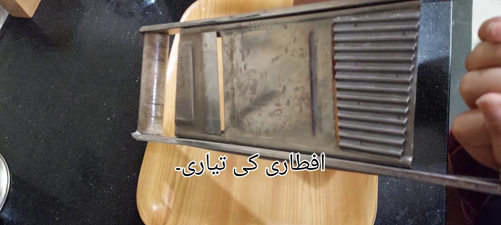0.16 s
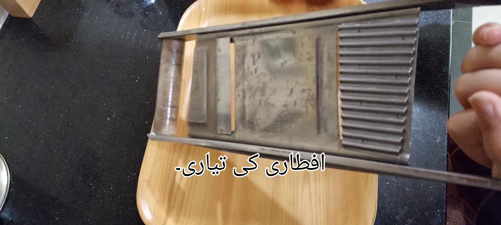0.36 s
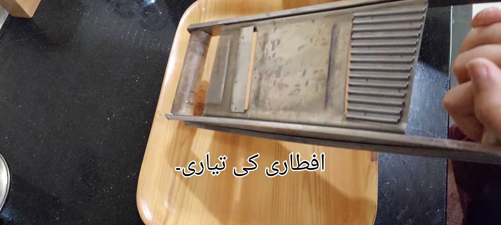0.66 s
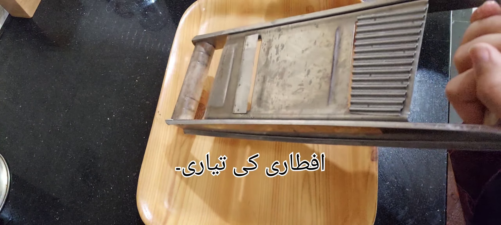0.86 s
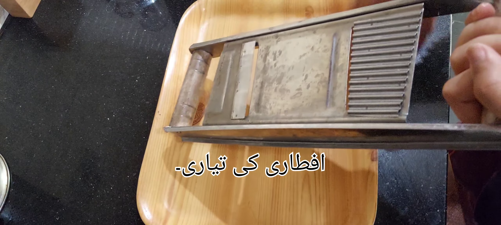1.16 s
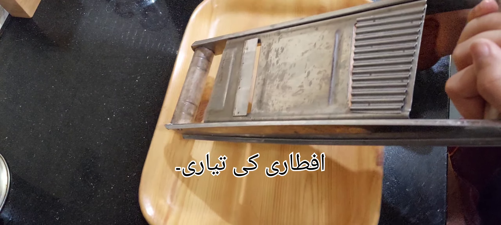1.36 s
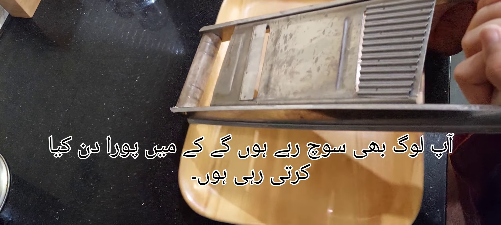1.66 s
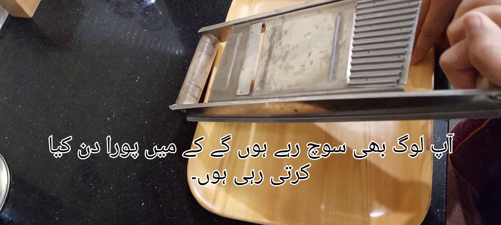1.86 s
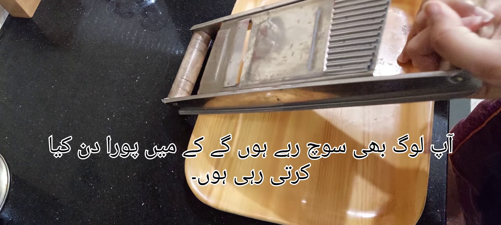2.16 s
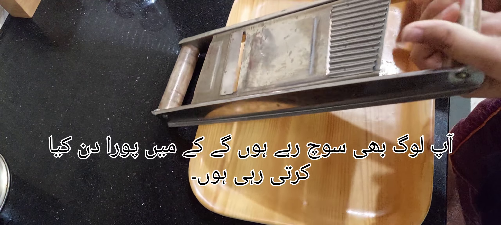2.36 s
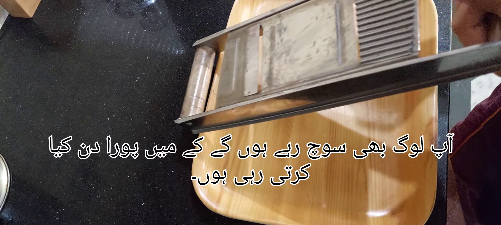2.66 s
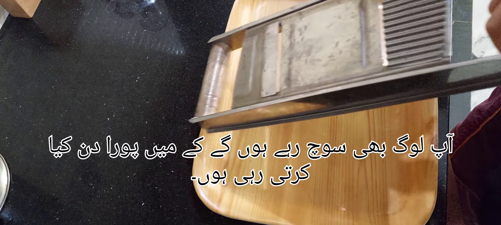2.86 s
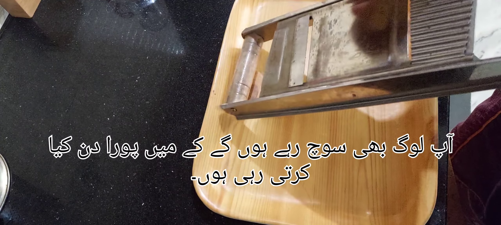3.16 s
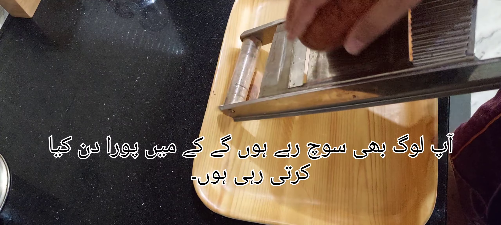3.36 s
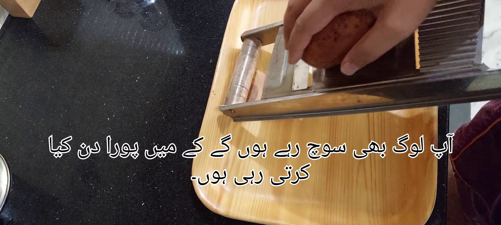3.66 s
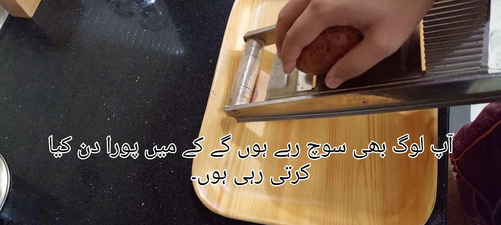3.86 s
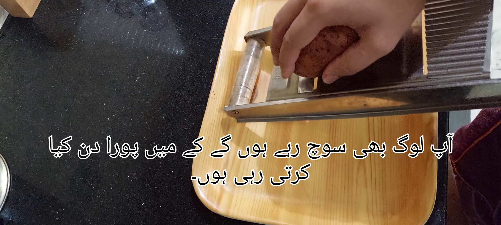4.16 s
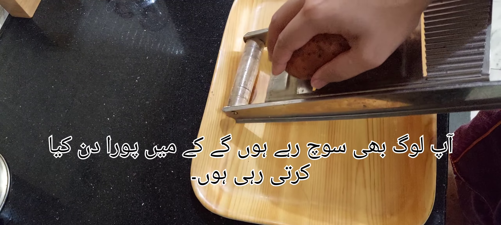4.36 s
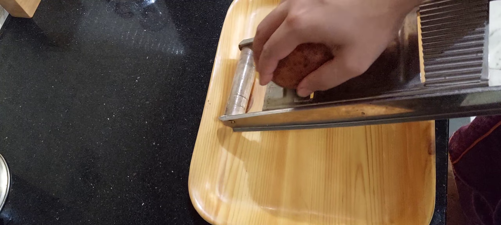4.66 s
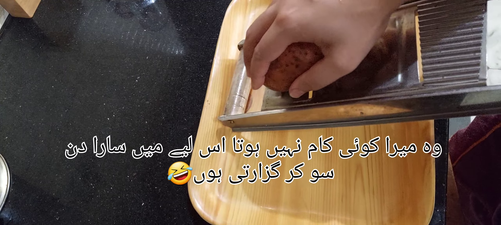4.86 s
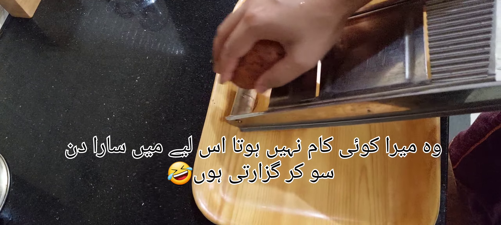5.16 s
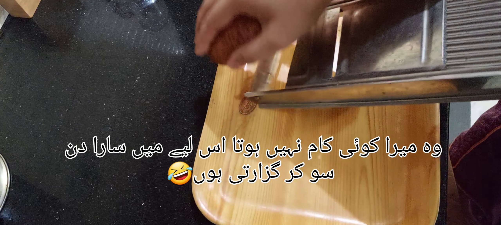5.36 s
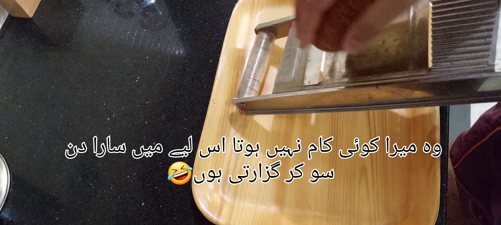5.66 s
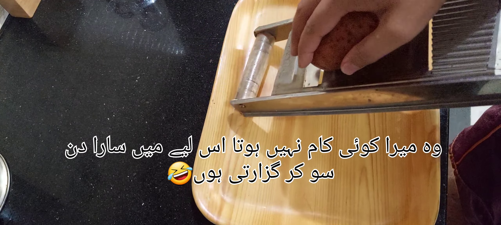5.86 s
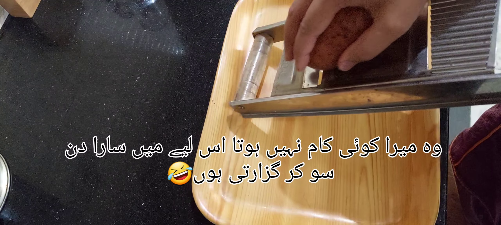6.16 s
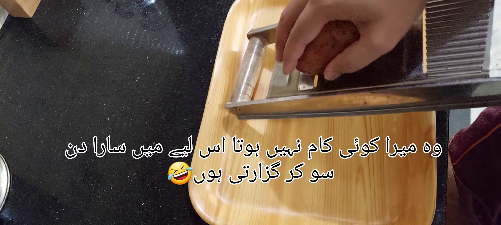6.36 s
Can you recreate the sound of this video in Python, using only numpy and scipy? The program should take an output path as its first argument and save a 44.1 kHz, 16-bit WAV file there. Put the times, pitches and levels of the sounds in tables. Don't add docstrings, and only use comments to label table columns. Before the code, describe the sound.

A metal slicer scrapes and clatters on a wooden tray, is set down hard, then a wet potato hisses over its blade amid low hum

```python
import sys
import numpy as np
from scipy import signal
from scipy.fft import rfft, irfft, next_fast_len
from scipy.io import wavfile

SR = 44100
rng = np.random.default_rng(int(sys.argv[2]) if len(sys.argv) > 2 else 0)


def transcribe(u):
    v = np.clip(np.atleast_2d(u).T, -1, 1)
    q = np.round(v * 32767).astype(np.int16)
    wavfile.write(sys.argv[1], SR, q)


def decibels_to_gain(level_db):
    exponent = np.asarray(level_db, float) / 20
    return 10 ** exponent


N = 286650


def rms_one(x):
    return x / np.sqrt(np.mean(x ** 2) + 1e-20)


def lowpass(x, order, hz):
    return signal.sosfilt(signal.butter(order, hz, fs=SR, output="sos"), x)


def in_time(rows):
    s, *columns = np.transpose(rows)
    return [np.interp(np.arange(N) / SR, s, c) for c in columns]


def at_hz(points, hz):
    point_hz, value = np.array(points).T
    return np.interp(np.log(hz + 1), np.log(point_hz), value)


def drift(rate_hz):
    r = np.exp(-80 * np.pi * rate_hz / SR)
    white = rng.standard_normal(N // 40 + 2002)
    slow = rms_one(signal.lfilter([1], [1, -2 * r, r * r], white)[2000:])
    return np.interp(np.arange(N) / 40, np.arange(len(slow)), slow)


def pair(alike):
    mid, side = rfft(rng.standard_normal((2, N)))
    c = np.clip(at_hz(alike, np.fft.rfftfreq(N, 1 / SR)), -1, 1)
    return irfft(np.sqrt(1 + c) * mid + np.sqrt(1 - c) * side * [[1], [-1]], N)


def colour(noise, spectrum):
    gain = decibels_to_gain(at_hz(spectrum, np.fft.rfftfreq(N, 1 / SR)))
    return rms_one(irfft(rfft(noise) * gain, N))


def ring(force, hz, t60):
    r = decibels_to_gain(-60 / (np.clip(t60, .01, .5) * SR))
    w = 2 * np.pi * hz / SR
    return signal.lfilter([0, np.sin(w)], [1, -2 * r * np.cos(w), r * r], force + 1e-18)


def swells(rows, rest_db):
    t = np.arange(N) / SR
    power = decibels_to_gain(rest_db) ** 2
    for middle, half, db in rows:
        fall_db = 12 * ((t - middle) / half) ** 2
        power = power + decibels_to_gain(db - np.minimum(fall_db, 99)) ** 2
    return 10 * np.log10(power)


def drone(hz, db):
    turn = 2 * np.pi * np.cumsum(hz * (1 + 0.01937 * drift(4.12))) / SR
    return decibels_to_gain(db + 2.2 * drift(10.5)) * np.sin(turn)


# time in seconds, upper pitch in Hz, lower pitch in Hz.
ENGINE_PITCH = [(0, 155.8, 111), (1.5, 152.4, 110.6), (3, 152.1, 102), (6.5, 151.7, 100.8)]
# middle in seconds, half length in seconds, level in dB.
UPPER_ENGINE = [
    (.08, 0.3, -39),
    (.56, 0.21, -43.5),
    (1.05, 0.11, -48),
    (1.6, 0.37, -50),
    (2.0, 0.33, -44),
    (2.45, 0.19, -44.5),
    (3.15, 0.62, -46.5),
    (3.9, 0.4, -51),
    (5.85, 0.67, -52.5),
]
# middle in seconds, half length in seconds, level in dB.
LOWER_ENGINE = [
    (.15, 0.12, -39),
    (.58, 0.2, -40.5),
    (.98, 0.73, -47.5),
    (1.44, 0.054, -33.5),
    (2.8, 0.088, -44),
    (3.33, 0.33, -46),
    (4.2, 0.41, -52.5),
    (5.7, 2.5, -51.5),
]


def engines():
    upper_hz, lower_hz = in_time(ENGINE_PITCH)
    upper_db, lower_db = swells(UPPER_ENGINE, rest_db=-85), swells(LOWER_ENGINE, rest_db=-85)
    return drone(upper_hz, upper_db) + drone(lower_hz, lower_db - 2.5)


def hum(white, hz, width_hz):
    r = np.exp(-np.pi * width_hz / SR)
    sos = [[1, 0.0031, -1.2, 1, -2 * r * np.cos(2 * np.pi * hz / SR), r * r]] * 2
    return rms_one(signal.sosfilt(sos, white))


# frequency in Hz, likeness from 0 to 1.
AIR_LIKENESS = [(60, 0.89), (180, 0.94), (400, 0.5), (1650, 0.025), (5000, 0.91), (15000, 1)]
# frequency in Hz, level in dB per Hz.
AIR_SPECTRUM = [(13, -75.5), (22, -23), (97, -7), (152, -7.5), (223, -14.5), (432, -15.5), (569, -21.5),
                (672, -21), (961, -25.5), (1270, -29.5), (2590, -69), (3510, -83.5), (7810, -42),
                (9480, -91), (16000, -72)]
# time in seconds, rumble level in dB.
TRAFFIC_LEVEL = [(0, -46.5), (.18, -41.5), (.4, -50.5), (1.05, -47.5), (1.3, -47), (1.43, -42.5),
                 (1.7, -46), (3.3, -50), (3.7, -52.5), (4.2, -52.5), (4.76, -49), (6.5, -49.5)]
# frequency in Hz, width in Hz, rms level in dB.
MACHINE_HUMS = [(62.5, 5, -61.5), (200.4, 9.8, -62.5), (299.7, 6.8, -65), (696, 12, -74.5),
                (966, 2.9, -69.5), (2590, 300, -76.5), (4820, 940, -80.5), (7830, 610, -85.5),
                (13300, 4300, -86.5)]


def background():
    rumble_db, = in_time(TRAFFIC_LEVEL)
    air = colour(pair(AIR_LIKENESS), AIR_SPECTRUM)
    low = lowpass(air, 2, 900)
    air = low * decibels_to_gain(rumble_db) + (air - low) * decibels_to_gain(-49.5)
    white = pair(AIR_LIKENESS)
    hums = sum(decibels_to_gain(db) * hum(white, hz, width_hz) for hz, width_hz, db in MACHINE_HUMS)
    return air + hums + engines()


def slides(starts, lengths, levels_db):
    grip, sag, release = 3498, 11, 256.5
    t = np.arange(N) / SR
    out = np.full(N, -200.)
    for start, length, db in zip(starts, lengths, levels_db):
        bite = grip * np.maximum(start - t, 0)
        slacken = sag * np.maximum(t - start, 0)
        let_go = release * np.maximum(t - start - length, 0)
        out = np.maximum(out, db - bite - slacken - let_go)
    return out


def patchy(noise, patchy_db):
    out = 0
    for cut_hz in (2000, 4000, 8000, .45 * SR):
        band = lowpass(noise, 2, cut_hz)
        out = out + band * decibels_to_gain(patchy_db * (drift(70) + drift(28)))
        noise = noise - band
    return out


def held(modes):
    return [(hz, db, min(t60, .06)) for hz, db, t60 in modes]


# frequency in Hz, level in dB, decay T60 in seconds.
STEEL_MODES = [(840, -4.5, 0.085), (1160, 0.5, 0.083), (1384, 1, 0.029), (1594, -2, 0.07), (1716, 1, 0.059),
               (1960, -7.5, 0.094), (2123, -11.5, 0.1), (2245, -2, 0.062), (2600, -4, 0.04),
               (2855, -6, 0.05), (3114, -8, 0.045), (3700, -13.5, 0.03), (4000, -23, 0.04),
               (4850, 5, 0.009)]
# frequency in Hz, level in dB, decay T60 in seconds.
WOOD_MODES = [(520, -15, 0.06), (594, -15, 0.06), (966, -3.5, 0.027), (1060, -8.5, 0.056),
              (1250.5, 0, 0.052), (1480, -1, 0.015), (1630, -3, 0.045), (1840, -4.5, 0.073),
              (2033, 0, 0.027), (2200, -2.5, 0.035), (2352, -11.5, 0.077), (2707, -15.5, 0.043),
              (3200, -15.5, 0.04), (4330, -13, 0.03)]


def body(force_of, modes, turn):
    out = np.zeros((2, N))
    for k, (hz, db, t60) in enumerate(modes):
        mode = decibels_to_gain(db) * ring(force_of(hz), hz, t60)
        lag = round(turn * SR / hz)
        out[k % 2] += mode
        out[1 - k % 2, lag:] += mode[:N - lag]
    return out


# frequency in Hz, level in dB per Hz.
FINGER_HISS = [(1470, -4), (2500, -2.5), (2620, -6.5), (4500, -2.5), (6300, -9.5), (7620, -1), (8620, -7.5),
               (10900, -10.5), (12200, -8.5), (15700, -15.5)]
# frequency in Hz, level in dB per Hz.
POTATO_HISS = [(500, -24), (800, -35), (1500, 5.5), (2300, 0.5), (3100, -4.5), (4200, 5), (6800, -7),
               (7600, 2.5), (10000, -4), (12300, 2.5), (14300, -4), (15800, -1)]


def skin_hiss(level_db):
    white = pair([(1500, 0.18), (6000, 0.14), (8000, 0.97), (14000, 0.79)])
    fingers = patchy(colour(white, FINGER_HISS), patchy_db=0.9)
    potato = patchy(colour(white, POTATO_HISS), patchy_db=0.5)
    hiss = np.where(np.arange(N) < 3.15 * SR, fingers, potato)
    hiss = hiss * decibels_to_gain(level_db + 3.0 + 1.45 * drift(30)) * decibels_to_gain([[.6], [-.6]])
    dull = lowpass(hiss[0], 4, 6000)
    hiss[0] += np.roll(dull, 11) - dull
    return hiss


# frequency in Hz, level in dB per Hz.
SCUFF = [(59, -45), (100, 2.5), (216, 1.5), (401, -7), (536, 0.5), (625, -5), (1330, -4.5), (2220, -4),
         (2780, -10.5), (6000, -19.5), (7800, -51), (13200, -120)]


def frame_drag(level_db):
    def slips(hz):
        chance = rng.random(N) < 900 / SR
        return chance * rng.standard_normal(N) * decibels_to_gain(2.5 * drift(9))
    rattle = rms_one(body(slips, held(STEEL_MODES[:11] + WOOD_MODES[:12]), turn=0.33))
    scuff = colour(pair([(500, 0.94), (5000, 0.046)]), SCUFF)
    return decibels_to_gain(level_db + 0.35 * drift(36)) * (decibels_to_gain(-3.5) * rattle + decibels_to_gain(-2.0) * scuff)


# start in seconds, length in seconds, hiss level in dB, drag level in dB.
FRAME_SLIDES = [(0, 0.19, -79, -55.5), (.155, 0.067, -78, -51.5), (0.256, 0.11, -85, -58),
                (1.342, 0.045, -54.5, -41), (1.393, 0.032, -50.5, -31), (1.458, 0.12, -49, -45.5),
                (1.584, .26, -52.5, -46), (2.038, 0.055, -60, -44.5), (2.095, 0.32, -61.5, -47.5),
                (2.427, 0.018, -58.5, -36), (2.463, 0.034, -76, -41), (2.542, 0.0053, -37.5, -26.5),
                (2.595, 0.17, -60, -47), (2.788, .16, -65, -52), (3.192, .012, -62, -30),
                (3.203, 0.16, -75, -44), (3.4, 0.13, -81, -56), (5.28, 0.0041, -44.5, -55),
                (5.303, 0.083, -53.5, -37), (5.44, 0.11, -71, -53.5), (5.848, 0.0085, -60, -46),
                (5.895, 0.077, -63.5, -43)]
# middle in seconds, half length in seconds, hiss level in dB, drag level in dB.
RUB_STROKES = [(2.014, 0.07, -66, -50.5), (2.99, 0.066, -73.5, -61), (3.826, 0.064, -73, -55.5),
               (3.84, 0.01, -58.5, -62), (5.23, 0.16, -60.5, -59), (4.034, 0.082, -69.5, -58),
               (4.18, 0.052, -55, -54), (4.39, 0.069, -60, -75), (4.537, 0.061, -54, -53.5),
               (4.703, 0.062, -57, -72), (4.79, 0.069, -49, -51.5), (5.049, 0.062, -46.5, -51),
               (5.116, 0.075, -43.5, -50.5), (5.266, 0.012, -56, -60), (4.29, .08, -76, -72),
               (4.927, .06, -70.5, -77), (6.18, 0.052, -71, -71), (5.752, .1, -69.5, -55),
               (6.075, 0.028, -58.5, -53.5), (6.11, 0.041, -59, -58), (6.278, 0.046, -50.5, -53.5),
               (6.366, 0.1, -66, -62), (6.5, 0.046, -58.5, -60)]


def rubbing():
    start, length, slide_hiss, slide_drag = np.transpose(FRAME_SLIDES)
    middle, half, stroke_hiss, stroke_drag = np.transpose(RUB_STROKES)
    hiss_db = np.maximum(slides(start, length, slide_hiss),
                         swells(zip(middle, half, stroke_hiss), rest_db=-86.5))
    drag_db = np.maximum(slides(start, length, slide_drag),
                         swells(zip(middle, half, stroke_drag), rest_db=-63))
    return skin_hiss(hiss_db) + frame_drag(drag_db)


def train(at, gain, t60=None):
    clicks = np.zeros(N)
    clicks[at] = gain
    if t60 is None:
        return clicks
    return signal.lfilter([1], [1, -decibels_to_gain(-60 / (t60 * SR))], clicks)


def rings(at, db, crack_db, ring_hz):
    steel_gap, wood_gap = (np.abs(ring_hz - np.array(modes)[:, :1]).min(axis=0)
                           for modes in (STEEL_MODES, WOOD_MODES))
    tray_share = np.where(wood_gap < steel_gap, 0.63, 0.39)

    def blows(share, hz):
        near_spot = np.exp(-(np.log(hz / ring_hz) / 0.035) ** 2)
        force = share * decibels_to_gain(db - 9.5 + 10.8 * near_spot)
        force = force * decibels_to_gain((crack_db + 10.5) * np.clip(hz / 2200 - 1, 0, 1))
        hit = train(at, force * decibels_to_gain(rng.normal(0, 4.0, len(at))))
        chatter = train(at, force, t60=0.052) * rng.standard_normal(N)
        return 1.12 * rng.choice([-1, 1]) * hit + 0.082 * chatter
    steel = body(lambda hz: blows(1 - tray_share, hz), held(STEEL_MODES), turn=0.22)
    wood = body(lambda hz: blows(tray_share, hz), held(WOOD_MODES), turn=0.18)
    return lowpass(steel + wood, 4, 6030)


# frequency in Hz, level in dB per Hz.
CRACK_SPECTRUM = [(290, 6.5), (500, -2.5), (919, -18), (1140, -15), (1440, -11.5), (2290, -6.5),
                  (3980, -13), (12100, -37), (16000, -63.5)]


def crack(at, db):
    noise = colour(pair([(500, 0.15), (5000, 0.19), (8000, 0.36)]), CRACK_SPECTRUM)
    burst = train(at, decibels_to_gain(db + 12.0), t60=0.041) + train(at, decibels_to_gain(db - 6.0), t60=0.45)
    return noise * lowpass(burst, 2, 1500)


# frequency in Hz, level in dB, decay T60 in seconds.
WORKTOP_MODES = [(119.6, -7.5, 0.73), (203.4, -5, 0.26), (272.5, -5, 0.045), (399, -4.5, 0.15),
                 (420, -31, 0.12)]


def worktop_thud(at, db):
    band = signal.butter(2, [70, 420], "band", fs=SR, output="sos")
    push = signal.sosfilt(band, train(at, decibels_to_gain(db - 1.5)))
    return sum(decibels_to_gain(level_db) * ring(push, hz, t60) for hz, level_db, t60 in WORKTOP_MODES)


# time in seconds, peak in dB, treble crack in dB re peak, strongest ring in Hz, worktop thud in dB re
SLICER_KNOCKS = [(0.082, -36, -32, 1100, -16), (0.088, -38, -30, 1160, -20),
                 (0.144, -33.5, -31, 1160, -23), (0.172, -31.5, -36, 1060, -19),
                 (1.341, -31, -24, 1160, -25), (1.356, -21, -16.5, 1060, -21),
                 (1.385, -22, -17, 1160, -13), (1.405, -16, -11, 1117, -11), (1.424, -17, -27, 1320, -22),
                 (1.434, -26, -36, 1160, -18), (1.445, -31, -18, 1680, -19), (1.508, -34, -12, 1630, -23),
                 (1.592, -29, -27, 1194, -5.5), (1.598, -34.5, -29, 1960, -16),
                 (1.612, -37, -30, 1210, -12), (1.744, -39, -6.5, 1160, -17),
                 (2.049, -30, -18, 1546, -13), (2.057, -37, -20, 2033, -13),
                 (2.066, -34.5, -25, 1480, -15), (2.182, -37.5, -22, 1480, -15),
                 (2.217, -40.5, -10.5, 1240, -20), (2.318, -44, -11, 1650, -20),
                 (2.344, -30, -21, 1384, -29), (2.353, -29.5, -26, 1675, -24),
                 (2.362, -35, -25, 1630, -24), (2.382, -25, -14.5, 1060, -23),
                 (2.43, -33.5, -17, 1160, -11), (2.439, -31, -31, 2030, -8), (2.513, -39, -21, 1300, -18),
                 (2.539, -21.5, -10.5, 1560, -22), (2.544, -22, -16, 1160, -15),
                 (2.567, -21, -13.5, 1390, -14), (2.76, -42, -15, 2030, -22), (2.835, -60, -6, 2290, -19),
                 (2.878, -45.5, -7.5, 1160, -22), (2.915, -37.5, -16, 1904, -0.5),
                 (3.184, -9, -16.5, 1160, -29), (3.187, -14, -13.5, 2600, -19),
                  (3.191, -19.5, -28, 2245, -19), (3.197, -30, -27, 1716, -18),
                  (3.216, -33, -24, 2245, -20), (3.24, -26.5, -11, 1960, -7),
                  (3.274, -21.5, -23, 1190, -13), (3.41, -26.5, -19.5, 1292, -15),
                  (3.837, -47, -17, 2270, -24), (5.283, -42.5, -4.5, 4000, -6),
                  (5.313, -34, -15, 1650, -29), (5.318, -32, -18, 2250, -29),
                  (5.337, -30.5, -20, 2200, -23), (5.353, -31, -18, 1850, -25),
                  (5.362, -33, -20, 1384, -23), (5.377, -32, -22, 2123, -25), (5.531, -51, -18, 1380, -23),
                  (5.545, -37.5, -13.5, 1270, -21), (5.559, -45, -18, 3114, -25),
                  (5.846, -13.5, -13.5, 1060, -20), (5.849, -18, -15, 2245, -42),
                  (5.855, -27, -22, 1060, -26), (5.877, -30.5, -25, 1250, -30)]


def knocks():
    s, db, crack_db, ring_hz, thud_db = np.transpose(SLICER_KNOCKS)
    at = np.round(s * SR).astype(int)
    clatter = rings(at, db, crack_db, ring_hz) + crack(at, db + crack_db)
    highpass = signal.butter(3, 620, "high", fs=SR, output="sos")
    return signal.sosfilt(highpass, clatter) + worktop_thud(at, db + thud_db)


# time in seconds, pitch in Hz, level in dB.
HORN_BEEPS = [
    [(.935, 345, -63), (.96, 359, -48.5), (1.0, 364, -46), (1.09, 365.8, -62.5), (1.15, 374, -70)],
    [(1.80, 344.5, -49), (1.84, 358, -49), (1.88, 366, -57), (1.93, 363, -76), (1.96, 372, -70)],
]
# frequency in Hz, level in dB.
HORN_DISC = [(360, -3), (720, -16), (2200, -25), (2600, -15), (2900, 1.5), (3270, 0), (3640, -16),
             (4300, -17), (4750, -18), (5600, -43)]
# frequency in Hz, level in dB per Hz.
DISC_RATTLE = [(1180, -47), (2000, -8), (3340, -2), (3810, -29), (4650, -12), (4990, -12), (13400, -28.5),
               (16000, -65)]


def horn():
    out, t = 0, np.arange(N) / SR
    rattle = colour(rng.standard_normal(N), DISC_RATTLE)
    for beep in HORN_BEEPS:
        hz, db = in_time(beep)
        turn = 2 * np.pi * np.cumsum(hz * (1 + .013 * drift(60))) / SR
        tone = sum(decibels_to_gain(at_hz(HORN_DISC, k * hz)) * np.sin(k * turn) for k in range(1, 16))
        on = (t > beep[0][0]) & (t < beep[-1][0])
        out = out + on * decibels_to_gain(db) * (decibels_to_gain(3.6 * drift(90)) * tone + decibels_to_gain(-7.0) * rattle)
    return out


# start in seconds, end in seconds, frequency in Hz, rms level in dB.
SINGING_MODES = [(1.018, 1.12, 4760, -72), (1.12, 1.338, 4850, -74), (6.24, 6.305, 4330, -61),
                 (4.72, 4.843, 4570, -67), (1.449, 1.557, 1630, -50), (1.469, 1.532, 3440, -55),
                 (1.586, 1.65, 1194, -52), (1.659, 1.777, 1992, -54.5), (1.66, 1.902, 1630, -60.5),
                 (1.74, 1.82, 1160, -56.5), (1.805, 1.877, 2277, -58.5), (2.05, 2.12, 840, -49.5),
                 (2.044, 2.117, 2190, -63), (2.157, 2.301, 855, -55.5), (2.165, 2.257, 1480, -53.5),
                 (2.177, 2.33, 1184, -57), (2.348, 2.602, 1302, -55), (5.31, 5.389, 2565, -52),
                 (5.326, 5.388, 1674, -51)]


def singing_grip():
    out = np.zeros((2, N))
    for start, end, hz, db in SINGING_MODES:
        a, b = round(start * SR), round(end * SR)
        sung = hum(rng.standard_normal((2, b - a)), hz, width_hz=48)
        swell = np.sin(np.linspace(0, np.pi, b - a)) ** 0.49
        out[:, a:b] += decibels_to_gain(db + 5.5) * sung * swell
    return out


def kitchen(x, t60):
    size = next_fast_len(N + SR)
    w = 2 * np.pi * np.fft.rfftfreq(size)
    wall_cut_hz = 4700
    decay = t60 / (1 + (w * SR / (2 * np.pi * wall_cut_hz)) ** 2) ** .5
    lags = rng.uniform(.011, .04, (10, 2, 1)) * SR
    echoes = 0
    for k, lag in enumerate(lags):
        loop = decibels_to_gain(-60 * lag / SR / decay) * np.exp(-1j * w * lag)
        echoes = echoes + (-1) ** k * loop / (1 - loop)
    return irfft(rfft(x, size) * echoes, size)[:, :N]


def scene():
    near = rubbing() + knocks() + singing_grip()
    beeps = horn()
    far = decibels_to_gain(-24) * beeps * [[1], [-1]] + decibels_to_gain(-8.5) * kitchen(beeps, t60=0.91)
    room = decibels_to_gain(-18.5) * kitchen(near.mean(axis=0), t60=0.45)
    return background() + near + room + far


def roll_off(x):
    return signal.sosfilt(signal.butter(12, 16340, fs=SR, output="sos"), x)


def record(dry):
    bass = lowpass(dry, 1, 200)
    ports = dry + bass * [[.16], [-.16]]
    rounded = 0.65 * np.tanh(ports / 0.78)
    top_cut = signal.ellip(10, .5, 45, 15780, fs=SR, output="sos")
    mix = signal.sosfilt(top_cut, rounded)
    return roll_off(mix)


dry = scene()
out = record(dry)
transcribe(out)
```